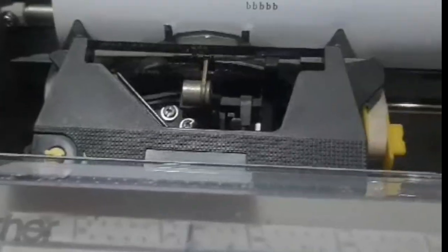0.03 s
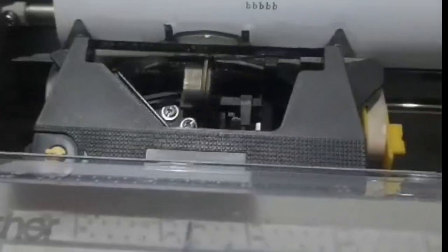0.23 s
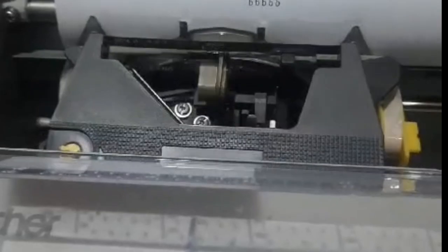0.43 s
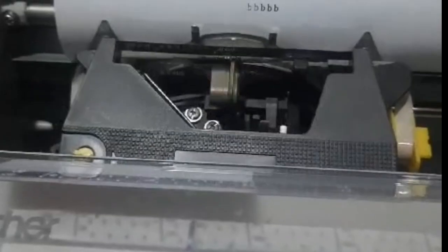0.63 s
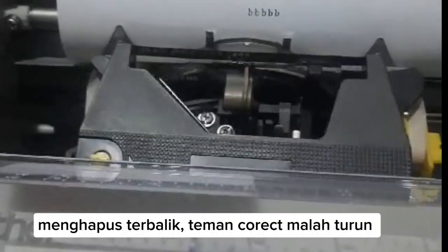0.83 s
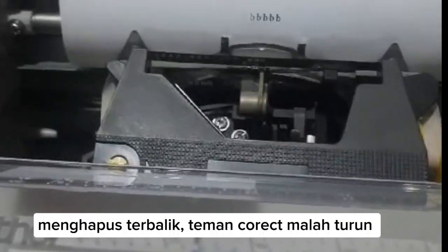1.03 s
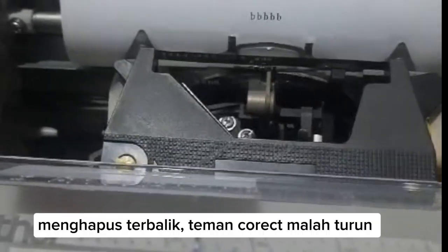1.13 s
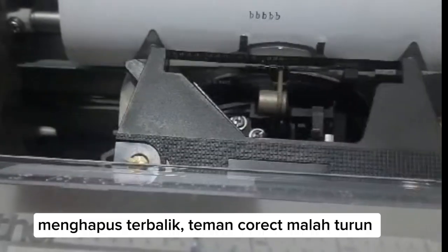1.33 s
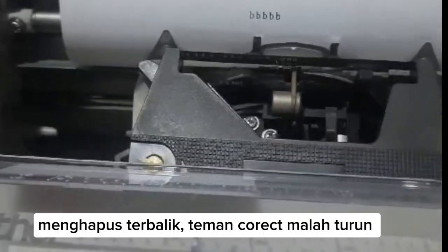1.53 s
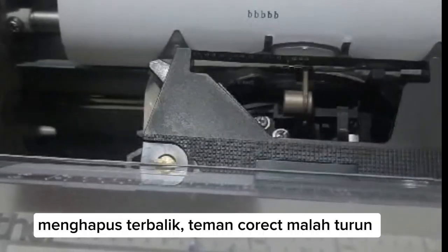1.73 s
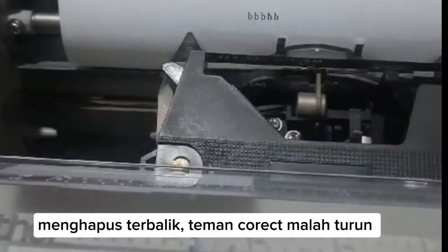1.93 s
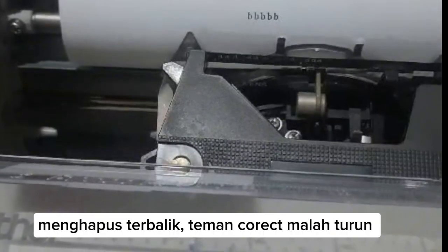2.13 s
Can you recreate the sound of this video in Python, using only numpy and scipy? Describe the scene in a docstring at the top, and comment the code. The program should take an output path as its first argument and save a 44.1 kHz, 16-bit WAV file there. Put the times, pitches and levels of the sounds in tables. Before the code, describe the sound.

Close to the microphone, an electric typewriter repeats one letter about ten times a second, each loud clack ringing its case. The strokes end suddenly, and a faint tick and short room echo fade over the motor's hum.

```python
"""Electric daisy-wheel typewriter.

One letter repeats about ten times a second, close by. The motors run up; in each stroke the ribbon
lift clacks, the linkage ticks, and the hammer hits the platen and rings the case.
A small tick and a soft swell of noise follow the last stroke; the room rings out over a low hum."""
import sys
import numpy as np
from scipy import signal
from scipy.fft import rfft, irfft, next_fast_len
from scipy.io import wavfile

SR = 44100
rng = np.random.default_rng(int(sys.argv[2]) if len(sys.argv) > 2 else 0)


def put_to_file(sound):
    """Save the sound as 16-bit audio at rate SR, in the file named by the first command-line argument."""
    columns = np.atleast_2d(sound).T  # one column per channel
    safe = np.clip(columns, -1, 1)
    whole_steps = np.round(safe * 32767)
    wavfile.write(sys.argv[1], SR, whole_steps.astype(np.int16))


N = 97020
T = np.arange(N) / SR

# Strokes: lift t/s, lift level/dB, hammer t/s, hammer level/dB
STROKE_HITS = [(0.2312, -12.3, 0.2648, -11.9), (0.3325, -11.4, 0.3642, -12.3),
               (0.4337, -13.6, 0.4659, -14.1), (0.5349, -14.4, 0.5664, -13.0),
               (0.636, -14.4, 0.6682, -12.7), (0.737, -14.6, 0.7685, -12.6), (0.8383, -15.2, 0.8694, -11.9),
               (0.9391, -14.7, 0.9707, -11.4), (1.0406, -14.4, 1.0724, -11.8),
               (1.1415, -15.1, 1.173, -11.5), (1.2428, -15.0, 1.2746, -11.0),
               (1.3438, -14.5, 1.3756, -13.4), (1.445, -13.9, 1.4762, -11.4),
               (1.5459, -14.6, 1.5773, -12.5), (1.6473, -14.9, 1.6789, -11.4),
               (1.7483, -14.3, 1.7795, -11.3), (1.8496, -14.2, 1.8809, -11.5)]

def typing():
    """Each stroke drives the ribbon lift, the hammer and the linkage."""
    strokes = np.array(STROKE_HITS)
    return ribbon_lift(strokes[:, :2]) + hammer(strokes[:, 2:]) + linkage(strokes[:, 0])

# Hammer crack spectrum: f/Hz, left/dB, right/dB
HAMMER_SPECTRUM = [(150, -28, -31), (400, -19, -19), (800, -15, -16), (1300, -9, -11), (1720, -12, -15),
                   (2200, -4.5, -9), (2750, -8, -13), (3200, -2, -11), (3600, -8, -16), (3900, -5, -14),
                   (4500, -8, -12), (5400, -8, -9), (6800, -8, -8), (7500, -12, -10), (8300, -10, -6),
                   (9700, -12, -18), (12500, -11, -12), (15500, -15, -15)]
# Hammer modes: f/Hz, left/dB, right/dB, t60/s
HAMMER_RESONANCES = [(1160, -12, -20, .05), (3060, -5, -16, .045), (3295, -1, -22, .045),
                     (3840, -10, -20, .04), (6650, -11, -8, .028), (7900, -9, -3, .032),
                     (10600, -11, -15, .025)]

def hammer(hits):
    """The hammer hits the platen: a short crack and a strong ring of the case."""
    return blows(hits, HAMMER_SPECTRUM, HAMMER_RESONANCES, rise_s=.0016, t60_s=.025,
                 crack_db=10.4, rattle_db=-5.3, case_db=.3)

# Lift clack spectrum: f/Hz, left/dB, right/dB
LIFT_SPECTRUM = [(150, -28, -27), (400, -21, -20), (800, -16, -17), (1300, -6.5, -7.5), (1700, -10, -13),
                 (2100, -5, -10), (2700, -6, -13), (3200, -1, -13), (3800, -10, -17), (4500, -7, -12),
                 (5300, -6, -7), (6600, -10, -6), (8200, -11, -6), (9700, -12, -18), (12000, -9, -9.5),
                 (15500, -11, -10)]
# Lift modes: f/Hz, left/dB, right/dB, t60/s
LIFT_RESONANCES = [(1210, -13, -13, .05), (1390, -9, -10, .05), (3280, -1, -19, .05), (4450, -11, -15, .04),
                   (5220, -7.5, -6.5, .05), (6450, -17, -8, .035), (8600, -15, -8, .025),
                   (12500, -9, -9, .02)]

def ribbon_lift(hits):
    """The ribbon lift clacks and rings the case lightly."""
    return blows(hits, LIFT_SPECTRUM, LIFT_RESONANCES, rise_s=.0008, t60_s=.036,
                 crack_db=6.5, rattle_db=-9.5, case_db=-10)

# Case rattle spectrum: f/Hz, left/dB, right/dB
CASE_SPECTRUM = [(100, -15, -15), (220, -16, -16), (310, -6, -6), (640, 0, -4), (900, -6, -7),
                 (1300, -4, -5), (1720, -8, -10), (1950, -3, -6), (2480, -3, -4), (2850, -9, -10),
                 (3300, -6, -12), (3700, -10, -13), (5200, -11, -10.5), (8000, -14, -12), (9800, -19, -22),
                 (12500, -19, -19), (15500, -24, -22)]
# Case modes: f/Hz, left/dB, right/dB, t60/s
CASE_RESONANCES = [(270, -23, -23, .2), (296, -19.5, -19.5, .22), (320, -23.5, -24, .24),
                   (392, -21, -23, .22), (454, -22, -17, .18), (479, -15, -28, .12), (532, -17, -24, .12),
                   (614, -15, -16, .2), (638, -12, -22, .13), (732, -23, -22, .2), (832, -21, -20, .12),
                   (1050, -27, -18, .09), (1855, -11, -24, .07), (2020, -21, -15, .1),
                   (2090, -15, -22, .08), (2285, -18, -21, .1), (2505, -17, -18, .19)]

def blows(hits, spectrum, modes, rise_s, t60_s, crack_db, rattle_db, case_db):
    """A part strikes repeatedly: it cracks and rings, the case rattles and rings."""
    out, size = np.zeros((2, N)), SR // 3
    part_phases = rng.uniform(-np.pi, np.pi, (len(modes), 2))
    case_phases = rng.uniform(-np.pi, np.pi, (len(CASE_RESONANCES), 2))

    def impact():
        crack = burst(spectrum, rise_s, t60_s, size)
        rattle = burst(CASE_SPECTRUM, rise_s=.003, t60_s=.11, size=size)
        return amp(crack_db) * crack + amp(rattle_db) * rattle

    common = impact()
    for start_s, level_db in hits:
        clack = np.sqrt(.5) * (common + impact())  # half the power repeats at every blow
        part_ring = ring(modes, part_phases, rise_s, size)
        case_ring = amp(case_db) * ring(CASE_RESONANCES, case_phases, rise_s, size)
        add(out, start_s, amp(level_db) * (clack + part_ring + case_ring))
    return out

def ring(modes, phases, rise_s, size, detune_sd=.002, level_sd_db=1, build_cycles=.4):
    """Damped modes, scattered slightly at each blow; low ones build up more slowly."""
    t, out = T[:size], np.zeros((2, size))
    for (hz, left_db, right_db, t60_s), (phase, skew) in zip(modes, phases):
        scatter_db = rng.normal(0, level_sd_db)
        tuned_hz = hz * rng.normal(1, detune_sd)
        stereo_phase = skew * min(hz / 2000, 1) * np.array([[.5], [-.5]])
        wave = np.sin(2 * np.pi * tuned_hz * t + phase + stereo_phase)
        gain = amp([[left_db], [right_db]]) * amp(scatter_db)
        out += gain * wave * envelope(t, rise_s + build_cycles / hz, t60_s)
    return out

# Ticks per stroke: t/s after the lift, level/dB, t60/s
LINKAGE_TICKS = [(.0045, -20, .025), (.0125, -22.5, .06), (.0222, -17, .04), (.027, -17, .035),
                 (.0405, -21, .05), (.047, -23, .06), (.062, -28.5, .09), (.093, -29, .04)]
# Tick spectrum: f/Hz, left/dB, right/dB
TICK_SPECTRUM = [(150, -9, -9), (300, -4, -4), (1200, -2, -2), (1700, -4, -5), (2400, 2, -1), (3200, 3, -4),
                 (4200, -2, -4), (5300, 0, 0), (7000, 0, 1), (9700, -8, -10), (12500, -5, -5),
                 (15500, -7, -7)]

def linkage(lifts_s, start_jolt_db=4.5, jolt_fade_s=.22, time_sd_s=.0005, level_sd_db=1.5):
    """Loose parts tick in every stroke; the first strokes shake them harder."""
    out = np.zeros((2, N))
    for lift_s in lifts_s:
        jolt_db = start_jolt_db * np.exp((lifts_s[0] - lift_s) / jolt_fade_s)
        for delay_s, level_db, t60_s in LINKAGE_TICKS:
            start_s = lift_s + rng.normal(delay_s, time_sd_s)
            gain = amp(rng.normal(level_db + jolt_db, level_sd_db))
            add(out, start_s, gain * burst(TICK_SPECTRUM, rise_s=.0004, t60_s=t60_s, size=SR // 8))
    return out

# Closing tick and swell: t/s, level/dB, rise/s, t60/s
CLOSING_BURSTS = [(1.942, -30, .003, .06), (2.02, -38, .012, .5)]

def tick_and_swell():
    """A small tick after the last stroke, then a soft swell of noise that fades."""
    out = np.zeros((2, N))
    for start_s, level_db, rise_s, t60_s in CLOSING_BURSTS:
        add(out, start_s, amp(level_db) * burst(CASE_SPECTRUM, rise_s, t60_s, size=SR // 3))
    return out

# Drive noise envelope: t/s, level/dB
DRIVE_LEVELS = [(.09, -90), (.105, -60), (.15, -51), (.21, -40), (.26, -37), (1.9, -38), (2.05, -40),
                (2.12, -46), (2.2, -49)]
# Drive noise spectrum: f/Hz, left/dB, right/dB
DRIVE_SPECTRUM = [(25, -40, -40), (38, -17, -17), (60, 4, -1), (100, -1, -5), (140, 3, 2), (230, -4, -4),
                  (330, 2, 2), (600, -4, -4), (1300, -6, -6), (2500, -11, -11), (6000, -21, -21),
                  (15000, -28, -28)]
# Run-up whines: t/s, length/s, f/Hz, level/dB
RUN_UP_WHINES = [(.115, .06, 335, -50), (.192, .035, 850, -42)]
# Hum partials: f/Hz, level/dB
HUM_PARTIALS = [(48.5, -49.5), (72, -57), (147, -56), (185, -55), (326, -53), (413, -50)]

def motors(hum_start_s=.1, hum_rise_s=.25):
    """The motors whine briefly as they run up, over drive noise and a low hum."""
    drive = amp(np.interp(T, *np.transpose(DRIVE_LEVELS))) * noise(DRIVE_SPECTRUM, N)
    whine, hum = np.zeros((2, N))
    for start_s, length_s, hz, level_db in RUN_UP_WHINES:
        swell = np.sin(np.pi * np.clip((T - start_s) / length_s, 0, 1))
        whine += amp(level_db) * swell * np.sin(2 * np.pi * hz * T)
    for hz, level_db in HUM_PARTIALS:
        hum += amp(level_db) * np.sin(2 * np.pi * (hz * T + rng.random()))
    hum *= np.clip((T - hum_start_s) / hum_rise_s, 0, 1)
    return drive + np.sqrt(2) * (whine + hum)  # sine rms to peak

# Room tail spectrum: f/Hz, left/dB, right/dB
ROOM_SPECTRUM = [(100, 3, 3), (330, 3, 3), (650, 2, 2), (1200, 1.5, 1.5), (2400, 0, 1), (3300, -5, -1),
                 (5000, -1, -1), (8000, -3, -4), (15500, -6, -6)]
# Room decay: f/Hz, t60/s
ROOM_DECAY = [(150, .9), (500, .85), (2000, .65), (6000, .55), (14000, .55)]

def room(source):
    """Hard walls reverberate; a new tail every 0.1 s stands for the moving carriage."""
    out, block = np.zeros((2, N)), SR // 10
    for start in range(0, N, block):
        hz, t, bands = signal.stft(noise(ROOM_SPECTRUM, SR), SR, nperseg=256)
        bands *= envelope(t, rise_s=.012, t60_s=log_interp(ROOM_DECAY, hz).T)
        _, tail = signal.istft(bands, SR, nperseg=256)
        tail /= np.linalg.norm(tail[0])
        add(out, start / SR, signal.fftconvolve(source[:, start:start + block], tail, axes=1))
    return out

# Left-right coherence: f/Hz, coherence/1
STEREO_COHERENCE = [(60, .55), (150, .8), (290, .88), (640, .68), (1300, 0), (15000, 0)]

def noise(spectrum, size):
    """Random-phase stereo noise of rms 1; the channels are partly alike in the bass."""
    hz = np.fft.rfftfreq(size, 1 / SR)
    phase = rng.uniform(0, 2 * np.pi, len(hz))
    coherence = np.clip(log_interp(STEREO_COHERENCE, hz), 1e-3, 1)
    spread_rad = np.sqrt(-2 * np.log(coherence))
    stereo_phase = spread_rad * rng.standard_normal(len(hz)) * [[.5], [-.5]]
    wave = irfft(amp(log_interp(spectrum, hz)) * np.exp(1j * (phase + stereo_phase)), size)
    return wave / np.sqrt(np.mean(wave ** 2) + 1e-20)

def burst(spectrum, rise_s, t60_s, size):
    """Shaped noise that swells and dies away."""
    return noise(spectrum, size) * envelope(T[:size], rise_s, t60_s)

def envelope(t, rise_s, t60_s):
    """Exponential rise and decay."""
    return (1 - np.exp(-t / rise_s)) * np.exp(-np.log(1000) * t / t60_s)

def log_interp(table, hz):
    """Table columns interpolated over log frequency."""
    table_hz, *columns = np.transpose(table)
    return np.array([np.interp(np.log(hz + 1), np.log(table_hz + 1), column) for column in columns])

def amp(db):
    """Decibels to gain."""
    return 10 ** (np.asarray(db) / 20)

def add(track, start_s, sound):
    """Mix a sound in at start_s."""
    span = track[:, round(start_s * SR):][:, :sound.shape[1]]
    span += sound[:, :span.shape[1]]

def scene(left_lag_s=.00018, room_db=-12.3):
    """The typewriter in its room; the strokes reach the right side first."""
    left, right = typing() + tick_and_swell()
    late_left = np.pad(left, (round(left_lag_s * SR), 0))[:N]
    machine = np.array([late_left, right])
    return machine + amp(room_db) * room(machine) + motors()

def record(dry, cutoff_hz=15800, transition_hz=300):
    """Clip at full scale, then low-pass."""
    size = next_fast_len(N + SR // 4)
    hz = np.fft.rfftfreq(size, 1 / SR)
    lowpass = np.clip((cutoff_hz - hz) / transition_hz + .5, 0, 1)
    return irfft(rfft(np.clip(dry, -1, 1), size) * lowpass, size)[:, :N]

dry = scene()
out = record(dry)
put_to_file(out)
```